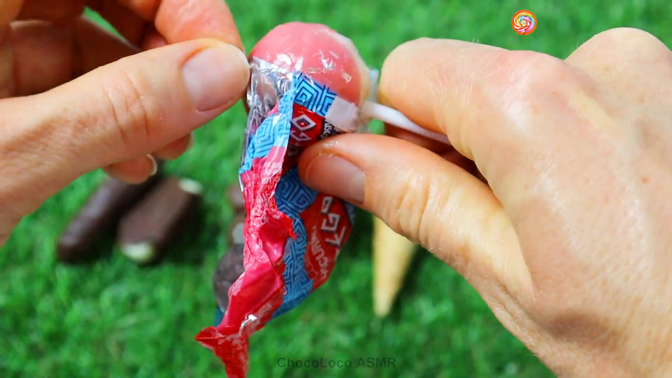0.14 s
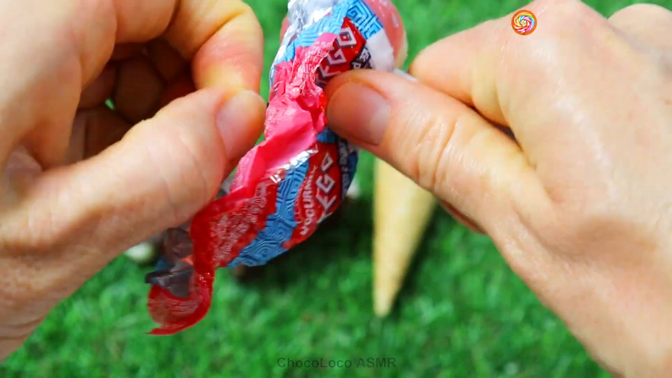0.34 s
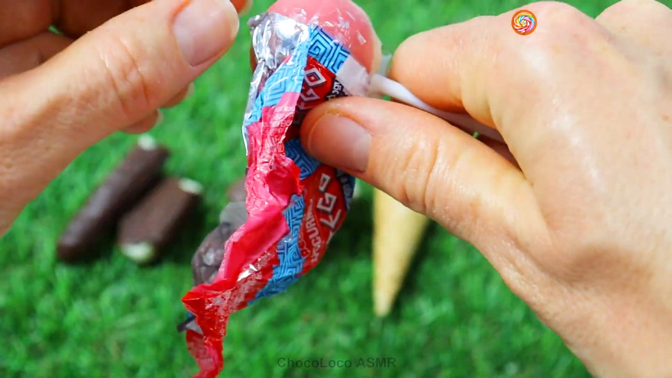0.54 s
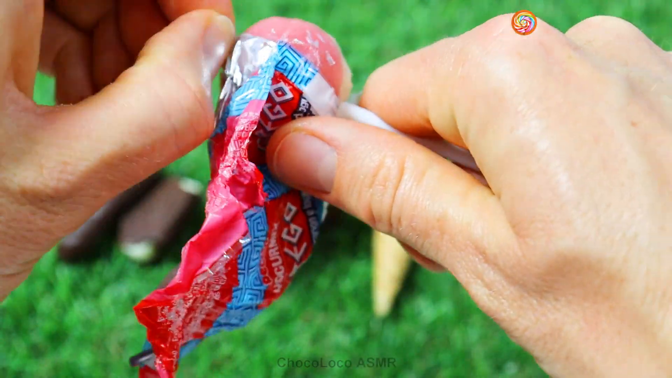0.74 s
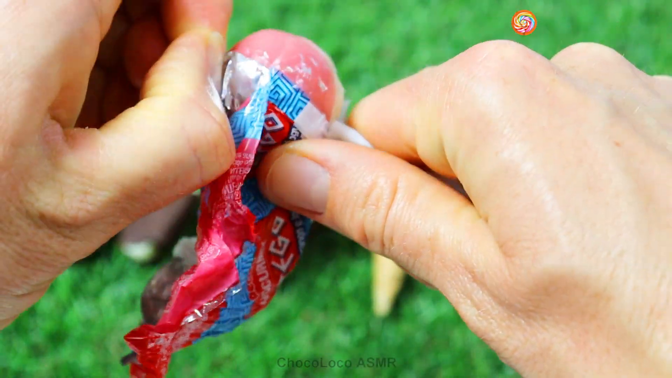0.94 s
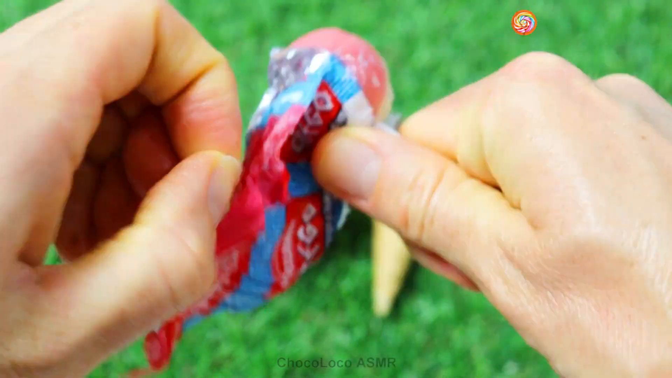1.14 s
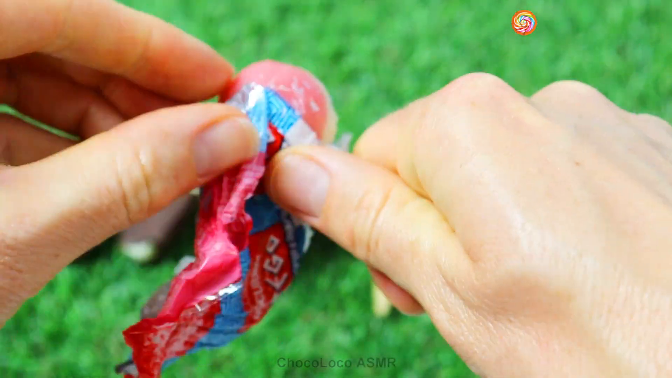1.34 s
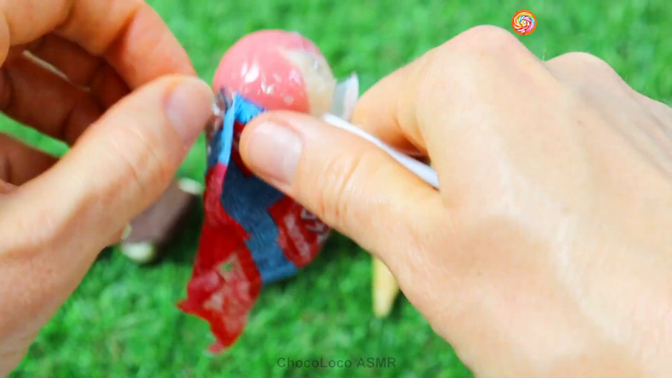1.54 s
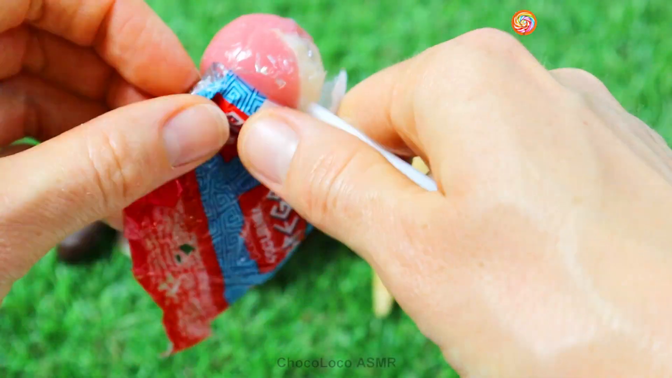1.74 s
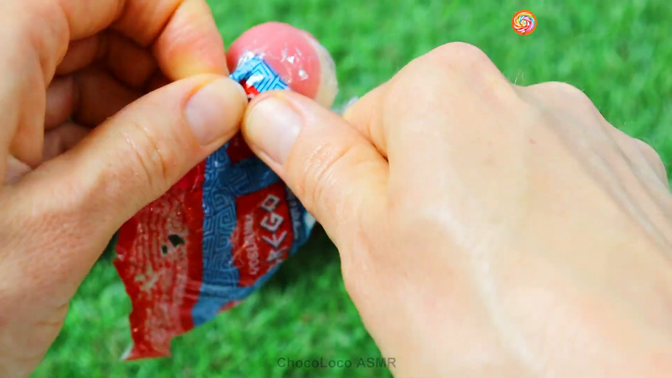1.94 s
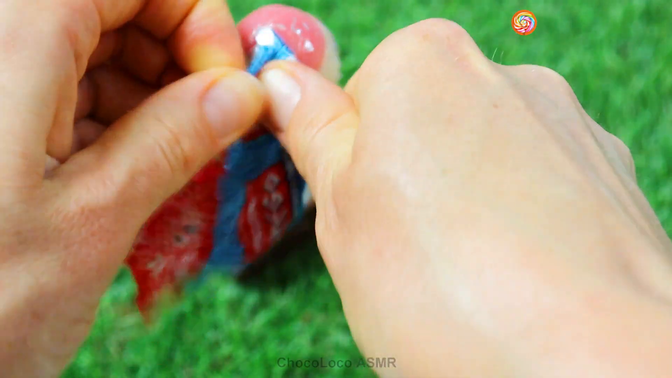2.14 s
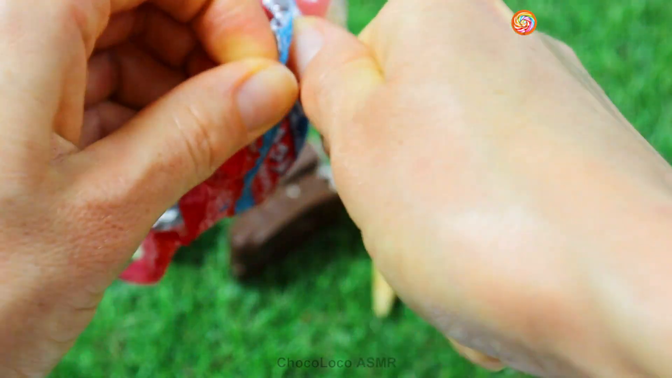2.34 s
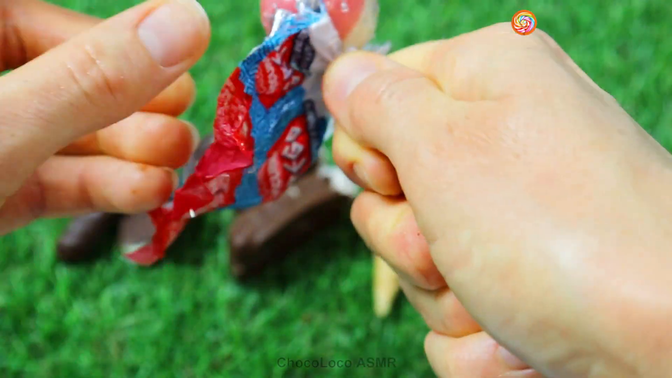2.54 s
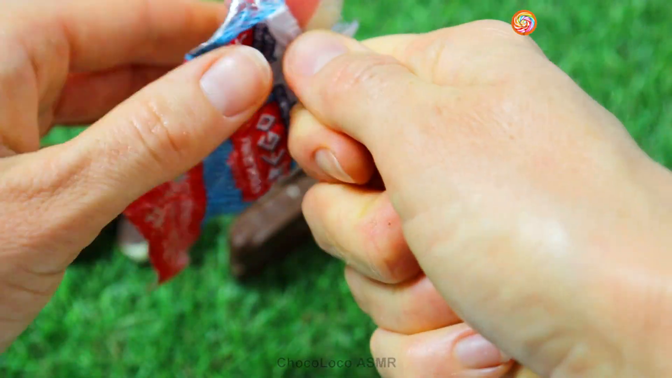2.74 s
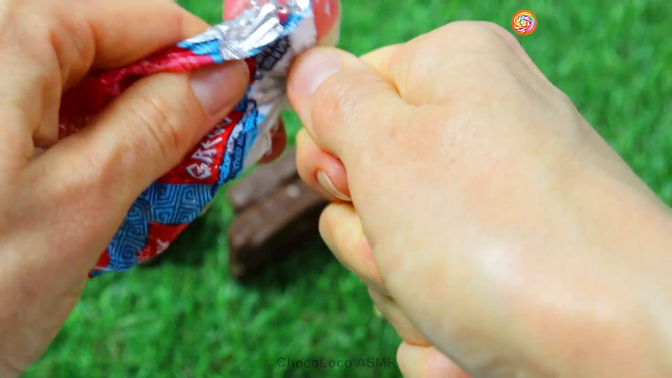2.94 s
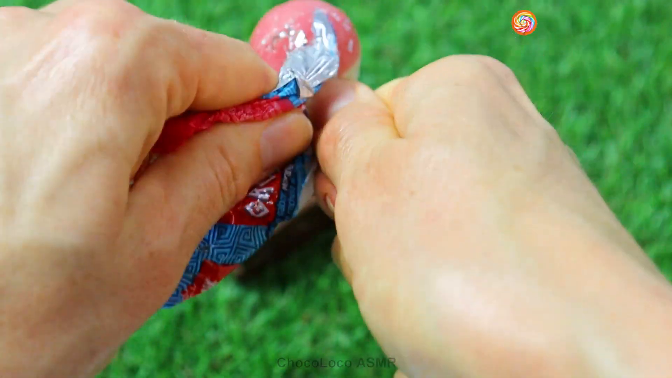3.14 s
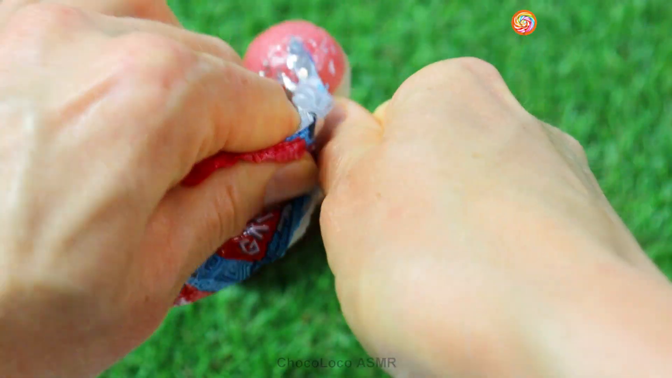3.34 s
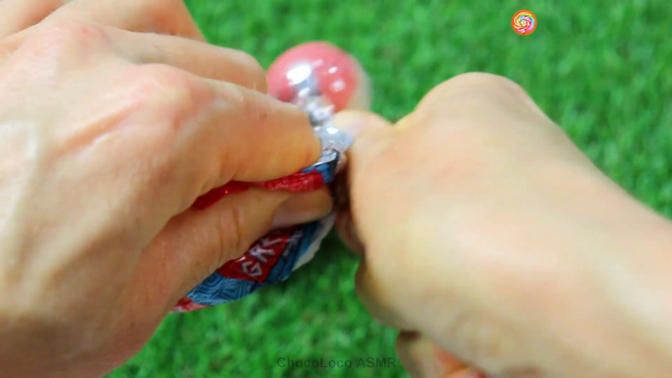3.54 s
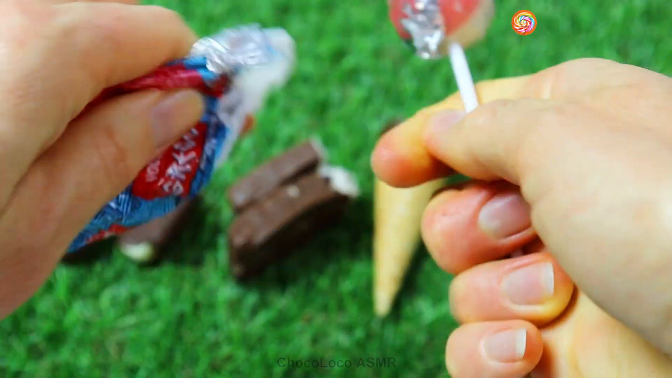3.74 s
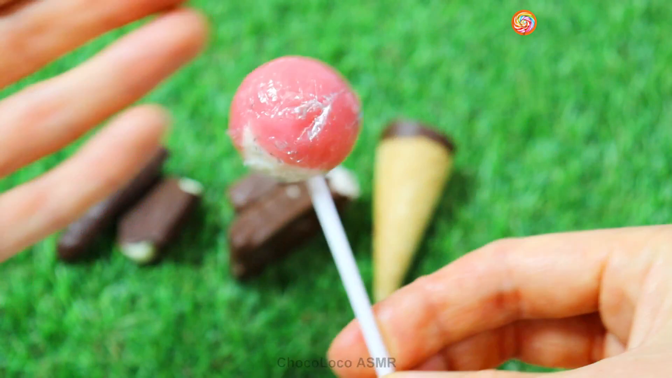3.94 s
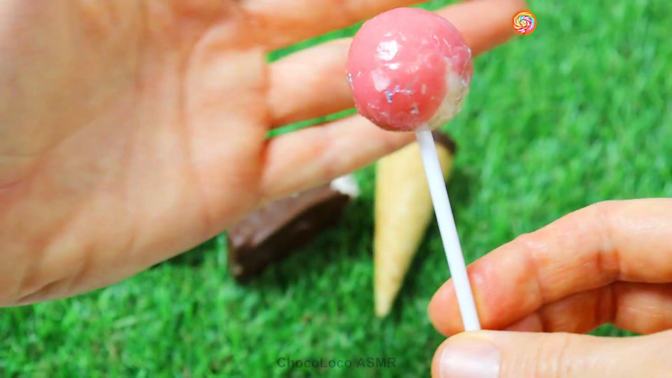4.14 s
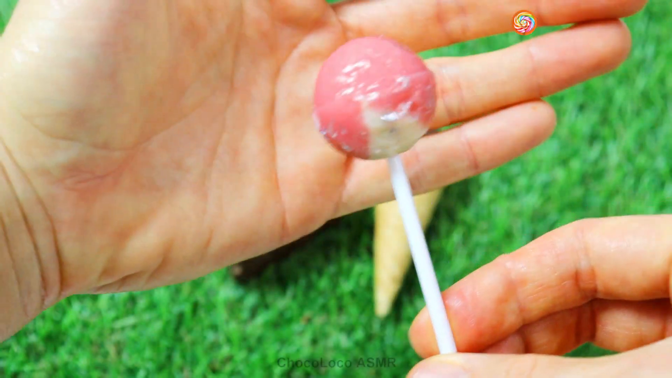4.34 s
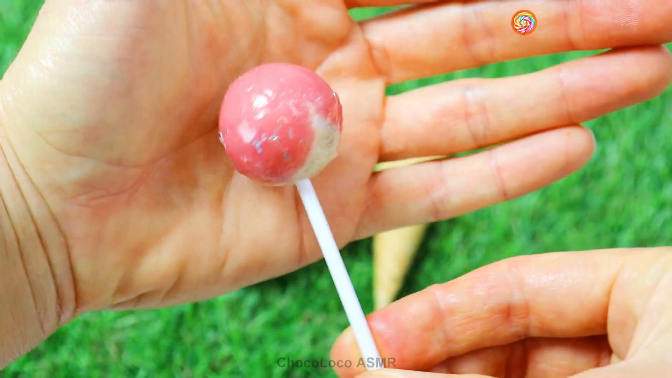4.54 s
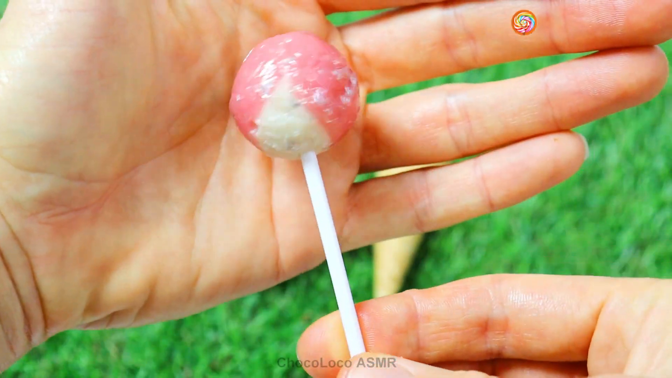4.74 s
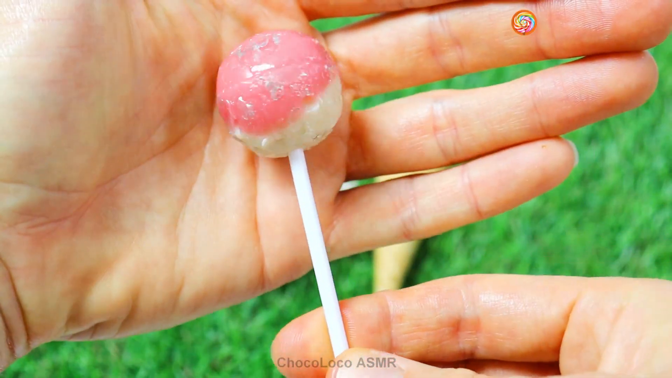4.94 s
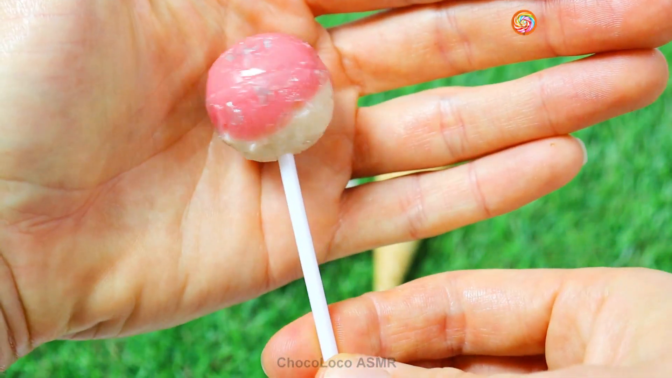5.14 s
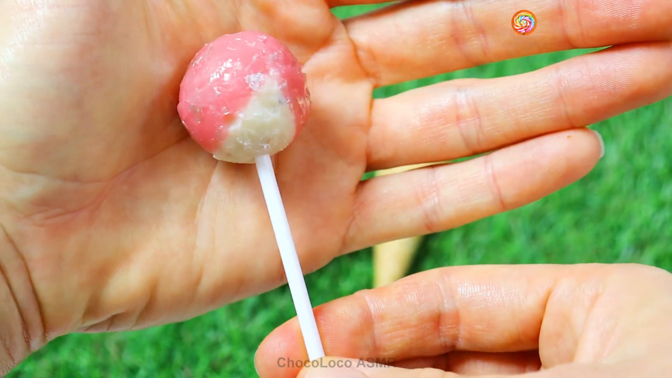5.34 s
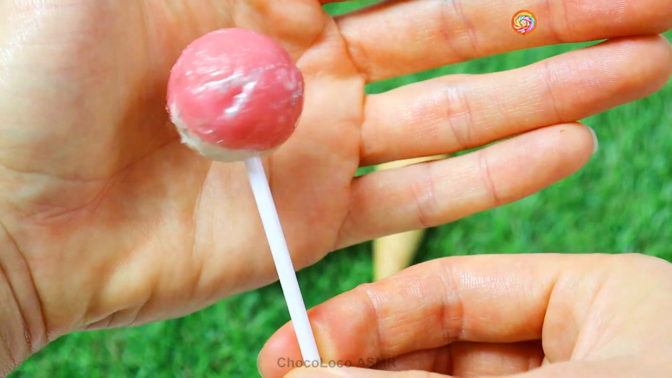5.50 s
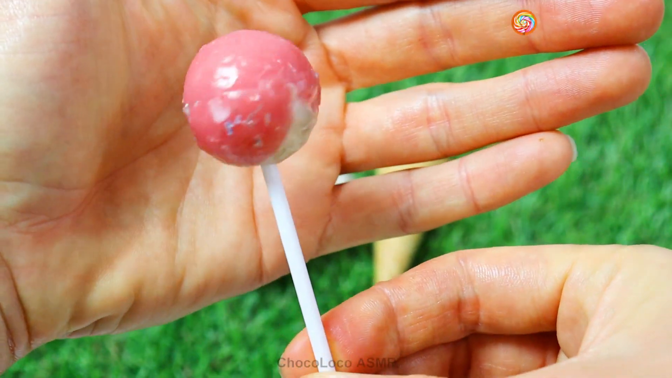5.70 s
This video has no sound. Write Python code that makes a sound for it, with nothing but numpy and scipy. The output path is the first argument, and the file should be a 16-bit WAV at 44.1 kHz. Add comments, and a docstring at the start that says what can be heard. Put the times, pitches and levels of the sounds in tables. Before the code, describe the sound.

Close, dry, bright stereo sound of crinkling candy film, slightly stronger on the left. Sparse quiet crackles with gaps grow into sudden hard snaps, kneading crackle and dull knocks, with a short airy room tail. The wrapper stops instantly near four seconds. Afterwards there is only very quiet hiss with faint hum, a soft low rustle of hands, and small woody ticks around four and a half to five seconds.

```python
"""A crisp plastic wrapper is peeled off a lollipop by two hands, close to a stereo microphone in a small room.
Pulls and kneading are bursts of tiny random buckles ringing through the film; creases snap as single flips, air
pockets knock as damped resonances, and brief low thumps of a damped pulse and low noise lie under some snaps.
The wrapper sound is cut off at 3.922 s, leaving coloured noise for hiss and a soft handling rustle, faint hum,
hollow ticks from noise through damped modes, and a thin sine tone that comes and goes twice."""
import sys
import numpy as np
from scipy import signal
from scipy.fft import rfft, irfft, next_fast_len
from scipy.io import wavfile

SR = 44100
rng = np.random.default_rng(int(sys.argv[2]) if len(sys.argv) > 2 else 0)


def log_audio(samples):
    """Write samples as a 16-bit WAV file to the path given in sys.argv[1]."""
    # one column per channel
    frames = np.atleast_2d(samples).T
    # limit to full scale, then quantise
    limited = np.clip(frames, -1, 1)
    pcm = np.round(limited * 32767).astype(np.int16)
    wavfile.write(sys.argv[1], SR, pcm)


N = 254456
TIME = np.arange(N) / SR
CUT_S = 3.922  # the wrapper sound is cut off here
EDGE_HZ = 16150  # upper band limit

# background hiss colour before the cut, and after it: (frequency [Hz], relative level [dB])
HISS_COLOUR_EARLY = [(20, -15), (45, -12), (90, -2), (170, 1), (350, -4), (700, -3), (1400, -4.5),
                     (2800, -8.5), (5600, -12), (10000, -16), (16000, -16)]
HISS_COLOUR_LATE = [(20, -18), (45, -8), (90, -1), (170, 3), (350, -2), (700, -1.5), (1400, -4), (2800, -7),
                    (5600, -10.5), (10000, -14.5), (16000, -12.5)]
# steady hum and whine: (frequency [Hz], width of one resonance stage [Hz], level [dB])
HUM_LINES = [(156.2, 23, -79), (1209, 53, -87), (13800, 186, -79.5)]
# left-right correlation of the background: (frequency [Hz], likeness [0-1])
STEREO_LIKENESS = [(60, .45), (300, 0.4), (1400, 0), (3000, 0)]
# colour of the soft handling rustle: (frequency [Hz], relative level [dB])
HANDLING_COLOUR = [(40, -21.5), (150, -3), (350, 3.5), (600, -5.5), (2000, -15), (12000, -28)]
# handling rustle over time: (time [s], level [dB])
HANDLING_LEVEL = [(3.9, -71), (4.0, -64), (4.2, -60), (4.5, -64), (4.75, -73), (5.1, -72.5), (5.7, -75.5)]
# faint hollow ticks: (time [s], level before the common tick gain [dB])
TICK_EVENTS = [(4.452, -57), (4.512, -59), (4.575, -60.5), (4.611, -60), (4.735, -55.5), (4.812, -58),
               (4.854, -52.5), (4.887, -59), (4.95, -61.5), (4.99, -63.5), (5.052, -61)]
# modes the ticks ring with: (frequency [Hz], Q of one resonance stage, relative level [dB])
TICK_RING = [(850, 4.1, -7.5), (1163, 8.5, 2), (2290, 3, -17.5)]
# faint thin tones: (start [s], end [s], frequency [Hz], level [dB])
THIN_TONES = [(5.27, 5.39, 1227, -73), (5.559, 5.773, 1225, -72.5)]
# decay of the room tail: (frequency [Hz], time to fall 60 dB [s])
ROOM_DECAY = [(200, 4.5), (1000, 0), (3500, 0.85), (7000, 0.44), (15000, 0.57)]
# colour and strength of the room tail: (frequency [Hz], gain [dB])
ROOM_COLOUR = [(100, -19.5), (500, -17), (950, -18.5), (1800, -9.5), (3500, -9), (6000, -11.5),
               (9000, -13.5), (15000, -20)]
# level sent into the room over time, weak early and stronger from about 2.1 s: (time [s], gain [dB])
ROOM_SEND = [(0, -10), (2.1, 6), (2.22, 1.5), (3.9, 0.5)]
# low thumps under some of the snaps: (time [s], level before left-right gain [dB], decay of the noise [s])
LOW_THUMPS = [(2.1778, -36.5, 0.0024), (2.2621, -37, 0.0034), (2.616, -64, 0.0045), (3.1535, -35, 0.0056),
              (3.1657, -42, 0.0032), (3.1709, -43.5, .003), (3.4139, -46, 0.0018), (3.5624, -51, 0.0014),
              (3.664, -36, 0.0037), (3.681, -31, .006)]
# colour of the noise in a thump: (frequency [Hz], relative level [dB])
THUMP_NOISE_COLOUR = [(20, -0.5), (60, 5), (170, -2), (350, -5), (900, -13.5), (3000, -39)]
# overall colour of all film sounds: (frequency [Hz], gain [dB])
FILM_COLOUR = [(100, 1.5), (400, -1.5), (800, 2), (1500, 3), (2100, 0), (3300, 0.5), (4200, -1),
               (6400, 0.5), (8500, 0), (10500, -.5), (12500, 1.5), (16000, 0)]
# pockets of the wrapper that cave in: (time [s], level before film colour [dB], pitch [Hz])
POCKETS = [(2.262, -35.5, 900), (2.613, -34.5, 238), (2.729, -46.5, 432), (2.901, -39.5, 444),
           (2.926, -41, 755), (3.414, -44, 604), (3.56, -44, 915), (3.681, -31, 910)]
# fingers working the wrapper loose between pulls:
# (time [s], crackle of taut film [dB], crumpling of slack film [dB]), levels before film colour
KNEADING_LEVELS = [(1.985, -63, -56), (2.07, -56, -63.5), (2.15, -41, -57), (2.33, -53.5, -47.5),
                   (2.48, -52.5, -56.5), (2.61, -37, -42), (2.67, -62.5, -49.5), (2.75, -53, -46),
                   (2.82, -49.5, -52), (2.91, -42, -41), (3.0, -39.5, -50.5), (3.12, -36.5, -60),
                   (3.26, -43, -68), (3.6, -46, -76.5), (3.71, -39, -46), (3.8, -47, -59.5),
                   (3.86, -46.5, -47), (3.92, -50, -48.5)]
# the loudest creases that snap:
# (event time before the fixed delay [s], level before snap gain [dB], film pitch [Hz], left over right [dB])
CREASES = [(0.064, -34, 3040, -2), (0.928, -28.5, 4290, -0.5), (0.975, -20, 4290, -4.5),
           (0.988, -23, 3290, -6), (1.093, -26.5, 12800, -1), (1.124, -25.5, 12700, -4),
           (1.222, -33.5, 2200, -6), (1.418, -37, 3940, -2.5), (1.46, -35, 3030, -10),
           (1.538, -35, 2250, -4), (1.575, -31, 9630, 0.0), (1.812, -26.5, 9350, -6),
           (1.846, -17, 4210, -1.5), (1.863, -26.5, 3020, -2.0), (1.899, -23.5, 6580, 1),
           (1.979, -35, 13600, 1), (2.039, -17.5, 7040, -3.5), (2.09, -27.5, 6640, 1),
           (2.121, -18.5, 8200, -3), (2.159, -10, 9450, -2), (2.177, -7, 12900, -4),
           (2.23, -6.5, 8760, -5.5), (2.231, -10, 9440, -4), (2.243, -9.5, 8830, -5),
           (2.253, -6.5, 5090, 3), (2.26, 2.5, 8890, -6), (2.266, -5, 12200, -5.5),
           (2.415, -23.5, 1560, -1.0), (2.438, -19, 8210, -0.5), (2.519, -13.5, 8400, -6),
           (2.549, -10.5, 3050, -3.5), (2.579, -14.5, 1770, -2), (2.617, -20, 1920, -8),
           (2.761, -29.5, 4380, 1.5), (2.79, -25.5, 2110, -3.5), (2.821, -16.5, 8220, -4.0),
           (2.84, -27, 1880, -2), (2.869, -14, 9070, 3), (2.925, -14, 2330, -2.5), (2.952, -6, 3590, 0.5),
           (2.977, -16, 11900, -1.5), (3.031, -14, 5870, -2.5), (3.044, -13, 8460, -0.5),
           (3.074, -9.5, 6460, -1.5), (3.093, -11.5, 5620, -2.5), (3.104, -12.5, 3360, 0),
           (3.138, -7.5, 12000, -4.5), (3.141, -7, 8780, 0.5), (3.152, 2, 6170, -4),
           (3.163, -4, 6510, -0.5), (3.169, 0.5, 6260, 0), (3.181, -4, 7040, 2), (3.189, -11.5, 3580, -1.0),
           (3.196, -9, 3690, -4.5), (3.296, -12, 9090, -1), (3.331, -7, 5570, -1.5),
           (3.338, -14.5, 5780, -3), (3.413, 0, 5910, -1.5), (3.421, -6.5, 6040, -0.5),
           (3.435, -5.5, 13000, -3), (3.509, -22.5, 6290, -5.5), (3.522, -24, 6570, -3),
           (3.531, -15, 6150, -2), (3.547, -10, 12400, -8), (3.558, -0.5, 7300, 0.5),
           (3.661, -5.5, 12300, 1.5), (3.68, 1, 6770, 0), (3.746, -18, 6650, -8), (3.812, -23, 8320, -5)]
# separate pulls on the film:
# (time of the peak [s], length [s], level before rustle gain [dB], film pitch [Hz], sharpness [Q])
FILM_PULLS = [(0.063, .035, -52.5, 1300, .8), (0.432, 0.081, -41, 3260, 0.53),
              (0.47, 0.096, -55, 2000, 1.8), (0.933, 0.05, -47, 3160, 1.2), (0.977, 0.047, -38, 3170, 0.99),
              (1.039, .09, -47, 2420, 2.7), (1.119, 0.12, -44, 15000, 3.7),
              (1.169, 0.048, -32.5, 12600, 1.6), (1.241, 0.066, -44.5, 1600, 0.21),
              (1.418, 0.045, -50.5, 3000, 0.76), (1.475, 0.057, -40, 2830, 0.37),
              (1.542, 0.082, -44.5, 1700, .3), (1.599, 0.028, -43, 10000, 0.51),
              (1.714, 0.046, -46, 2220, 0.14), (1.814, 0.08, -42.5, 7500, 0.24),
              (1.848, .07, -33, 5000, .9), (1.908, 0.071, -41, 14500, 3), (2.004, 0.055, -38.5, 15010, 1.1),
              (2.127, 0.037, -36, 4400, 0.17), (2.233, .045, -17, 9000, .4),
              (2.266, 0.033, -12.5, 5000, 0.57), (2.548, 0.11, -33, 4000, 0.31),
              (2.609, 0.041, -31.5, 9000, 0.24), (2.88, 0.037, -31, 7100, 1.2),
              (2.899, 0.031, -33, 2400, 0.36), (2.947, 0.061, -34, 2400, .4),
              (3.158, 0.052, -18, 6100, 0.55), (3.177, .07, -32.5, 3586, 2), (3.417, 0.031, -35, 7370, 1),
              (3.453, 0.047, -23, 13000, 0.3), (3.557, 0.089, -33, 6200, 0.69),
              (3.655, 0.09, -22, 8950, 0.26), (3.685, 0.025, -29.5, 2940, .3),
              (3.742, 0.073, -43.5, 3000, 0.63)]


def amp(db):
    """Decibels to gain."""
    return 10 ** (np.asarray(db) / 20)


def stereo_gain(left_db, right_db):
    """Gains of the left and right capsule, as a column."""
    return amp(np.array([[left_db], [right_db]]))


def unit(x):
    """Scales to an rms of one."""
    return x / np.sqrt(np.mean(abs(x) ** 2) + 1e-20)


def freqs(size):
    """Frequencies of a real spectrum, kept off zero."""
    return np.maximum(np.fft.rfftfreq(size, 1 / SR), 1)


def read(points, hz):
    """Reads a table on a log-frequency axis."""
    f, value = np.transpose(points)
    return np.interp(np.log(hz), np.log(f), value)


def over_time(points):
    """Gain at every sample from a table of (time [s], level [dB])."""
    return amp(np.interp(TIME, *np.transpose(points)))


def colour(x, points):
    """Filters by a table of (frequency [Hz], gain [dB])."""
    size = next_fast_len(x.shape[-1])
    gain = amp(read(points, freqs(size)))
    return irfft(rfft(x, size) * gain, size)[..., :x.shape[-1]]


def add(mix, s, sound):
    """Mixes a stereo sound in at time s, trimmed to the length of the mix."""
    start = round(s * SR)
    sound = sound[:, max(-start, 0):]
    part = mix[:, max(start, 0):][:, :sound.shape[1]]
    part += sound[:, :part.shape[1]]


def resonance(f, hz, q):
    """Response of one damped mode, peaking at hz."""
    return 1 / (1 + 1j * max(q, .1) * (f / hz - hz / f))


def air(points):
    """Stereo noise of a given colour, partly alike in the bass and unrelated in the treble."""
    left, other = rfft(rng.standard_normal((2, N)))
    same = np.clip(read(STEREO_LIKENESS, freqs(N)), 0, 1)
    right = same * left + np.sqrt(1 - same ** 2) * other
    return unit(colour(irfft([left, right], N), points))


def background(before, early_db=-62.5, late_db=-59.0):
    """Hiss that changes colour and level at the cut, steady hum, and a soft rub of hands."""
    early = before * amp(early_db) * air(HISS_COLOUR_EARLY)
    late = (1 - before) * amp(late_db) * air(HISS_COLOUR_LATE)
    f = freqs(N)
    lines = sum(amp(db) * unit(resonance(f, hz, hz / width) ** 2) for hz, width, db in HUM_LINES)
    hum = irfft(rfft(rng.standard_normal(N)) * lines, N)
    handling = air(HANDLING_COLOUR) * over_time(HANDLING_LEVEL)
    return early + late + hum + handling


def thin_tones():
    """A faint sine comes and goes, the same at both capsules."""
    out = np.zeros((2, N))
    for start, end, hz, db in THIN_TONES:
        t = np.arange(0, end - start, 1 / SR)
        tone = unit(np.sin(2 * np.pi * hz * t) * signal.windows.tukey(len(t), .3))
        add(out, start, np.ones((2, 1)) * amp(db) * tone)
    return out


def ticks(swell_s=0.0037, gain_db=2.5, size=4096):
    """Short swells of noise ring a few damped modes, giving soft hollow ticks."""
    out, t, f = np.zeros((2, N)), np.arange(size) / SR, freqs(size)
    ring = sum(amp(db) * resonance(f, hz, q) ** 2 for hz, q, db in TICK_RING)
    swell = t / swell_s * np.exp(1 - t / swell_s)
    # fainter ones fall at random, 14 a second
    first_s, last_s, per_s, faint_db = 4.1, 4.5, 14, -69
    fainter = [(s, faint_db) for s in rng.uniform(first_s, last_s, round(per_s * (last_s - first_s)))]
    for s, db in TICK_EVENTS + fainter:
        # one touch shared by both capsules, plus a part of its own in each
        touch = rng.standard_normal(size) + .5 * rng.standard_normal((2, size))
        add(out, s, unit(irfft(rfft(touch) * ring)) * amp(db + gain_db) * swell)
    return out


def room(x, early_db=-12.0, early_s=0.0032):
    """Quick reflections off the hands and table, then a diffuse tail unrelated in the two channels."""
    hz, t, z = signal.stft(rng.standard_normal((2, SR)), SR, nperseg=256)
    hz = np.maximum(hz, 1)
    # each band of noise fades at its own rate
    decay = amp(-60 * t / read(ROOM_DECAY, hz)[:, None]) * (t > .008)
    decay /= np.linalg.norm(decay, axis=1, keepdims=True)
    tail = signal.istft(z * decay, SR, nperseg=256)[1][:, :SR]
    tail = colour(tail / np.linalg.norm(tail[0]), ROOM_COLOUR)
    t = TIME[:SR]
    early = rng.standard_normal((2, SR)) * np.exp(-t / early_s) * (t > .0008)
    early *= amp(early_db) / np.linalg.norm(early[0])
    return signal.fftconvolve(x, tail + early, axes=1)[:, :N]


def thumps(noise_share=0.41, pulse_s=0.0004, size=4096):
    """A brief low pulse and a short burst of low noise under some of the snaps, stronger on the right."""
    out, t = np.zeros((2, N)), np.arange(size) / SR
    pulse = t / pulse_s * np.exp(-t / pulse_s) * np.cos(2 * np.pi * 90 * t)
    for s, db, decay in LOW_THUMPS:
        envelope = np.exp(-t / decay) * (1 - np.exp(-t / .0005))
        burst = colour(rng.standard_normal(size), THUMP_NOISE_COLOUR) * envelope
        thump = unit(unit(pulse) + noise_share * unit(burst))
        thump *= np.sqrt(decay * SR / 2 / size)  # energy grows with the decay time
        add(out, s, thump * amp(db) * stereo_gain(-3., 2.5))
    return out


def ports(f, lead_s=3e-5, wander_s=1.3e-5):
    """Sound mostly reaches the left capsule slightly earlier, by an amount that varies with the spot."""
    delay = lead_s + wander_s * rng.standard_normal()
    return np.exp(-2j * np.pi * f * delay * np.array([[0], [1]]))


def knocks(q=1.2, decay_s=.005, size=2048):
    """A short shudder of collapsing film rings the air pocket inside the wrapper."""
    out, t, f = np.zeros((2, N)), np.arange(size) / SR, freqs(size)
    for s, db, hz in POCKETS:
        shudder = rng.standard_normal(size) * np.exp(-t / decay_s)
        knock = unit(irfft(rfft(shudder) * resonance(f, hz, q) * ports(f)))
        add(out, s, knock * amp(db) * np.sqrt(decay_s * SR / size))
    return out


def film(f, hz, q, body_db, body_hz=500, body_q=0.28):
    """A stiff facet of film rings high, over the low hollow of the crumpled wrapper."""
    return unit(resonance(f, hz, q) + amp(body_db) * resonance(f, body_hz, body_q))


def facet(f, low_hz=2000, high_hz=15000, q=5.5, strength=1.56):
    """Every spot of crumpled film has a ringing mode of its own, at a random pitch."""
    hz = low_hz * (high_hz / low_hz) ** rng.random()
    return 1 + strength * resonance(f, hz, q)


def crease(scatter, ring_s, size=256):
    """One sharp flip, followed by high flutter through the sheet that differs at each capsule."""
    flutter = np.diff(rng.standard_normal((2, size + 1))) + .5 * rng.standard_normal(size)
    flutter *= np.exp(-np.arange(size) / SR / ring_s)
    flutter[:, :3] = 0  # the flutter starts just after the flip
    flutter *= scatter / np.linalg.norm(flutter[0])
    flutter[:, 0] = 1  # the flip
    return flutter


def snaps(gain_db=-8.5, q=1.0, delay_s=.0012, scatter=1.0, ring_s=0.00072, bend_s=.00016, size=1024):
    """Large creases flip over one at a time, each ringing its own facet, after one fixed delay."""
    out, f = np.zeros((2, N)), freqs(size)
    for s, db, hz, pan_db in CREASES:
        # a snap that comes with a thump has more hollow body
        has_thump = min(abs(s - thump[0]) for thump in LOW_THUMPS) < .005
        body_db = -13.5 if has_thump else -30
        # bending waves are dispersive: the treble arrives a little before the lows
        bend = np.exp(-4j * np.pi * bend_s * rng.uniform(.5, 2.104) * np.sqrt(f * hz))
        ring = film(f, hz, q, body_db) * facet(f) * (f < EDGE_HZ)
        snap = irfft(rfft(crease(scatter, ring_s), size) * ring * ports(f) * bend)
        snap = unit(snap) * np.sqrt(SR / 1000 / size)  # the energy of 1 ms at unit rms
        add(out, s + delay_s, snap * amp(db + gain_db) * stereo_gain(pan_db / 2, -pan_db / 2))
    return out


def crackle(ring, per_s, spread_db, pops_per_s, pop_db, scatter=0.65, count=3):
    """Tiny buckles and a few larger pops at several spots on a film with the response ring."""
    size, sound = 2 * (len(ring) - 1), 0
    f = freqs(size)
    for spot in range(count):
        sizes_db = spread_db * np.minimum(rng.exponential(1, size), 4)
        buckles = (rng.random(size) < per_s / SR) * amp(sizes_db)
        popping = rng.random(size) < pops_per_s / count / SR
        pops = popping * amp(pop_db) * rng.uniform(0.56, 2.55, size)
        clicks = (buckles + pops) * rng.choice([-1, 1], size)  # film flips either way
        sound = sound + rfft(clicks) * facet(f) * ports(f) * rfft(crease(scatter, 0.00076), size)
    return unit(irfft(sound * ring * (f < EDGE_HZ)))


def kneading(taut_hz=7000, slack_hz=1200, slack_body_db=-1., slack_body_hz=400, left_db=-0.5, size=8192):
    """Steady crackle under the fingers, passing from one patch of film to the next."""
    taut, slack, f = np.zeros((2, N)), np.zeros((2, N)), freqs(size)
    s, taut_db, slack_db = np.transpose(KNEADING_LEVELS)
    fade = np.sin(np.pi * np.arange(size) / size)
    taut_ring = film(f, taut_hz, q=0.55, body_db=-28)
    slack_ring = film(f, slack_hz, q=0.55, body_db=slack_body_db, body_hz=slack_body_hz, body_q=2.3)
    hop_s = size / 2 / SR  # patches overlap by half
    for start in np.arange(s[0] - hop_s, s[-1], hop_s):
        add(taut, start, fade * crackle(taut_ring, per_s=800, spread_db=3.5, pops_per_s=75, pop_db=23.))
        add(slack, start, fade * crackle(slack_ring, per_s=1100, spread_db=1.5, pops_per_s=70, pop_db=18.5))
    taut *= amp(np.interp(TIME, s, taut_db))
    slack *= amp(np.interp(TIME, s, slack_db))
    return (taut + slack) * (TIME > s[0]) * stereo_gain(left_db, -left_db)


def rustle(left_db=-0.47, gain_db=0.88, rise_share=0.38, drop_db=23, size=12288):
    """Each pull sets off a swell of crackle, the hollower the slacker the film."""
    out, f = np.zeros((2, N)), freqs(size)
    t = (np.arange(size) - size // 3) / SR  # zero at the peak of the pull
    for s, length, db, hz, q in FILM_PULLS:
        # slack film rings low and hollow, taut film high and thin: -9 dB of body per octave
        body_db = -5.5 - 9 * np.log2(hz / 1500)
        sound = crackle(film(f, hz, q, body_db), per_s=3000, spread_db=4.0, pops_per_s=90, pop_db=16.5)
        # every pull falls by drop_db to either end of its length, and on beyond
        away = np.maximum(-t / rise_share, t / (1 - rise_share)) / length
        add(out, s + t[0], sound * amp(db - drop_db * away))
    return out * amp(gain_db) * stereo_gain(left_db, -left_db)


def scene():
    """The close wrapper in its room, up to the cut, over the quiet background."""
    before = np.clip((CUT_S - TIME) / 0.0015, 0, 1)
    quiet = background(before) + ticks() + thin_tones()
    wrapper = colour(rustle() + kneading() + snaps() + knocks(), FILM_COLOUR)
    echo = room(wrapper * over_time(ROOM_SEND))
    return before * (wrapper + echo + thumps()) + quiet


def record(dry):
    """Band-limits the microphone signal, clips peaks beyond full scale, then band-limits again."""
    lowpass = signal.firwin(255, EDGE_HZ, window=("kaiser", 8), fs=SR)[None]
    loud = np.clip(signal.oaconvolve(dry, lowpass, "same"), -1, 1)
    return signal.oaconvolve(loud, lowpass, "same")


dry = scene()
out = record(dry)
log_audio(out)
```